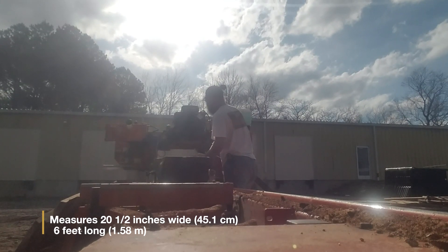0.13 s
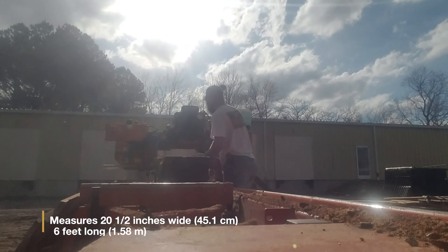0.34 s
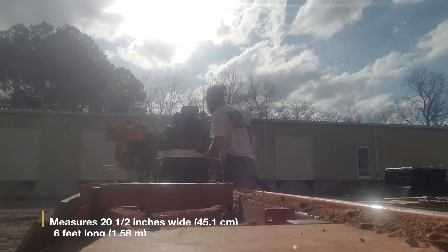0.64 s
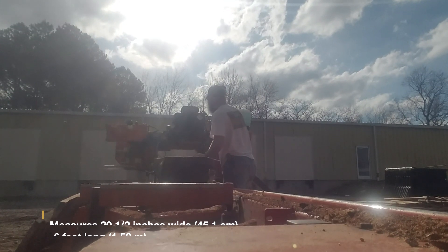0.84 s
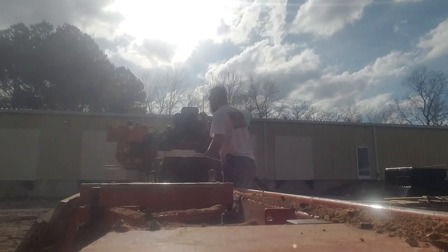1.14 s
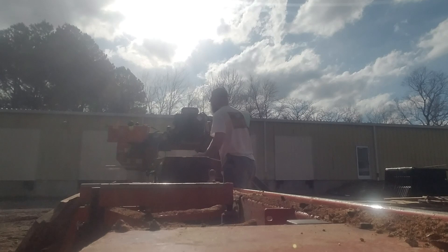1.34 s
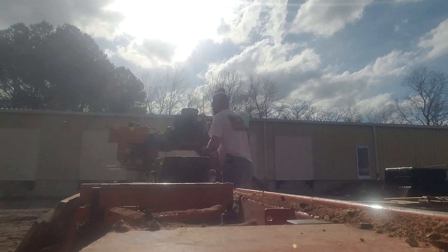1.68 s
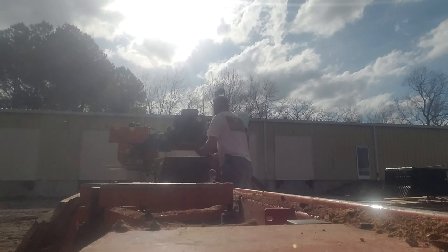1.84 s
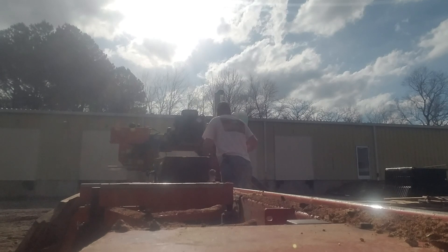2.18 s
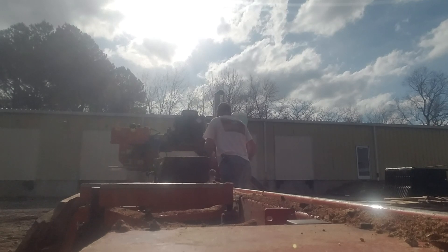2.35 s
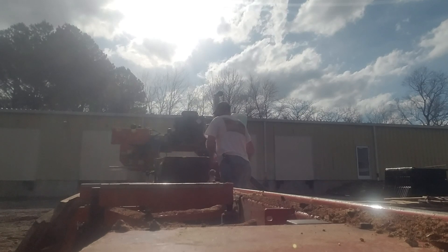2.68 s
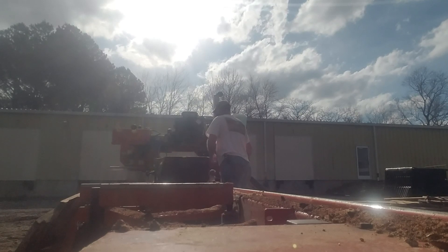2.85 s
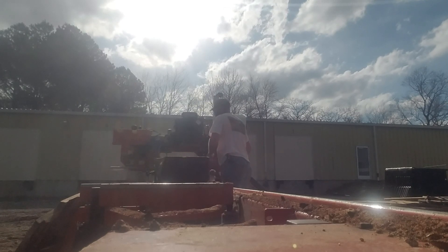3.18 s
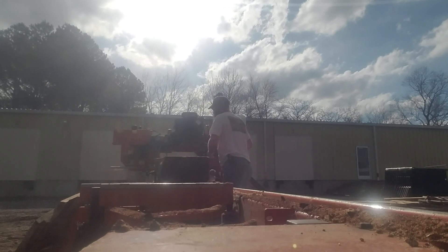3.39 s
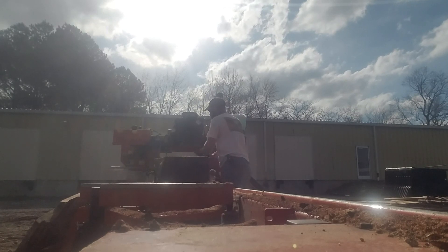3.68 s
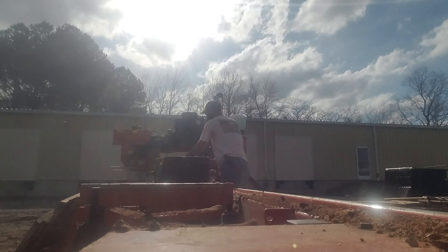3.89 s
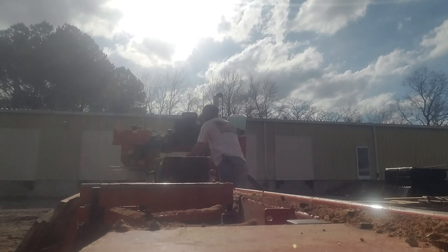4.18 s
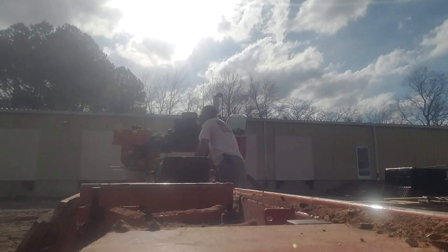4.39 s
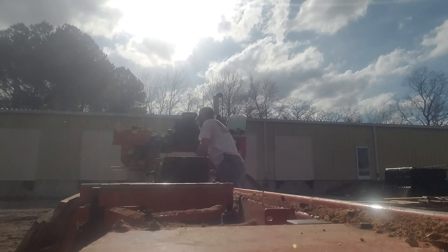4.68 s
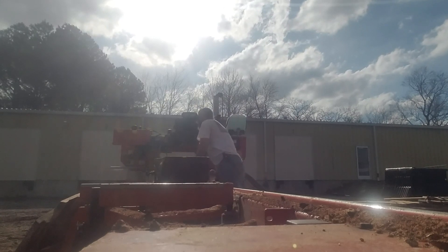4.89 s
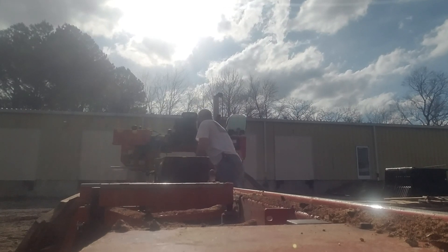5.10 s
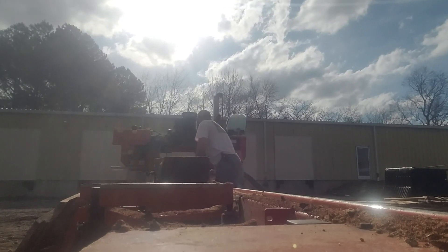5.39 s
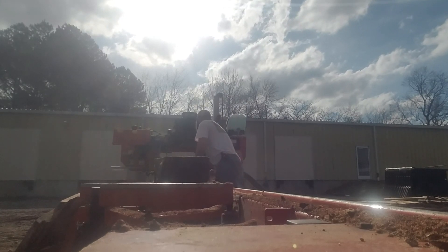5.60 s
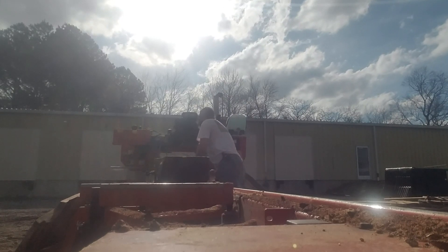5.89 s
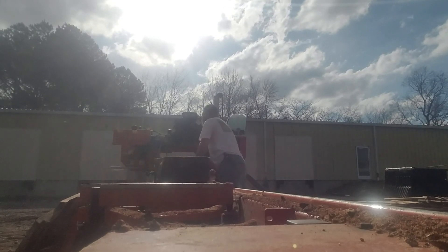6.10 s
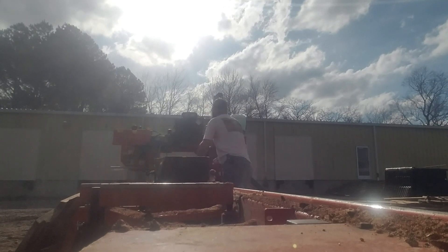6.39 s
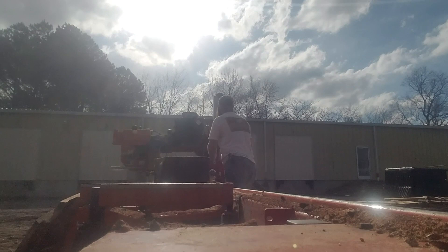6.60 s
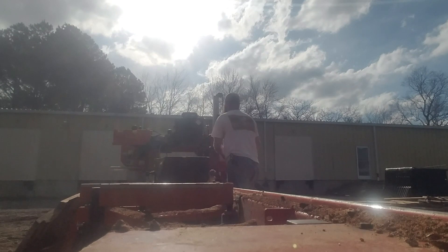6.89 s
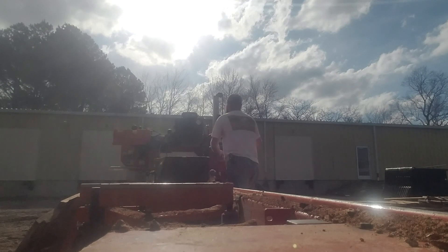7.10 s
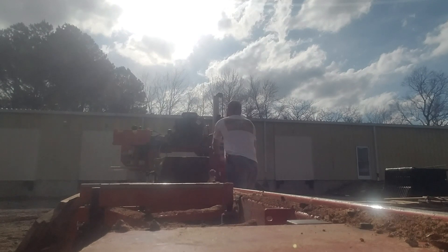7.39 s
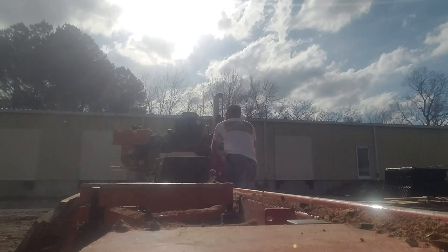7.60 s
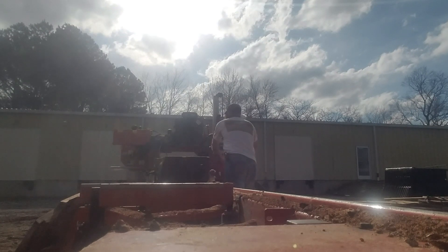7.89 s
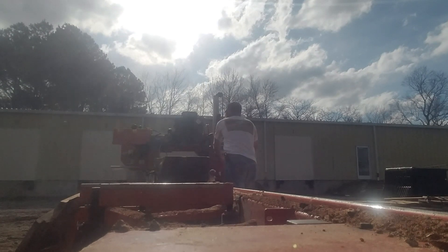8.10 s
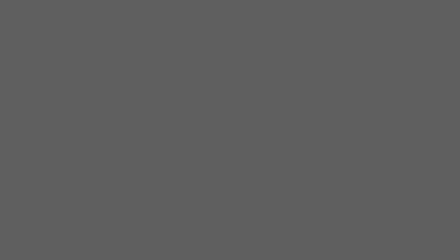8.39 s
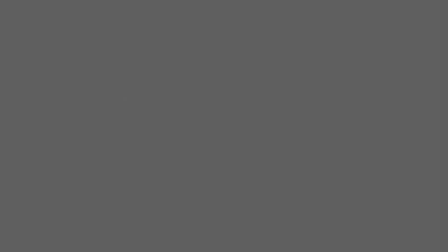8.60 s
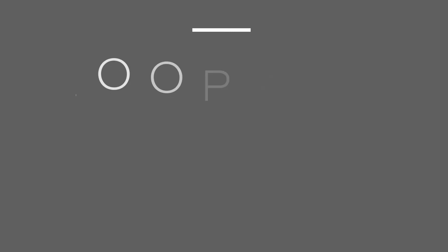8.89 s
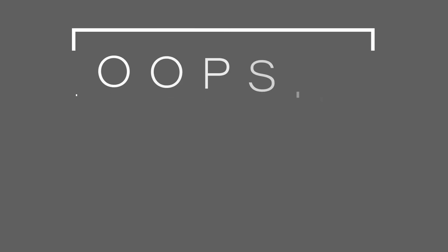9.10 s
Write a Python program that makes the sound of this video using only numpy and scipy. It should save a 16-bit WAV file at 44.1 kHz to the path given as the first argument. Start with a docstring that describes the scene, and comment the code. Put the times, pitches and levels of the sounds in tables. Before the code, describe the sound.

Outdoors, very close to a portable sawmill, a small petrol engine sags under load with deep rumble. The frame groans twice within the first second, then the engine surges and the blade sizzles brighter. It eases to a rough steady drone with wavering belt hum, faint squeaks and soft wind thumps. Around eight seconds everything cuts instantly to silence.

```python
"""Portable band sawmill

A small petrol engine outdoors bogs down under load, the log groans twice under the stalling blade, then the
engine surges and the governor hunts back to speed. Tones locked to the engine cycle and filtered noise make the
engine; filtered noise and ringing resonances make the running blade, with a belt hum, squeaks and puffs of
wind. Two close microphone ports pick it up. The sound stops dead near the end and silence follows."""
import sys
import numpy as np
from scipy import signal
from scipy.fft import rfft, irfft, next_fast_len
from scipy.io import wavfile

SR = 44100
rng = np.random.default_rng(int(sys.argv[2]) if len(sys.argv) > 2 else 0)


def transcribe(u):
    """Save the signal u as a 16-bit wav file named by the first command-line argument.

    u: samples, shape (n,) or (channels, n), limited to [-1, 1]; the rate is SR.
    q: integer samples, one column per channel.
    """
    v = np.clip(np.atleast_2d(u).T, -1, 1)
    q = np.round(v * 32767).astype(np.int16)
    wavfile.write(sys.argv[1], SR, q)


N = 407921
TIME_S = np.arange(N) / SR
# FFT length and its frequencies; the tiny offset keeps the logarithm finite at zero
SIZE = next_fast_len(N)
HZ = np.arange(SIZE // 2 + 1) * SR / SIZE + 1e-3


def from_db(db):
    """Turn decibels into a gain."""
    return np.exp(np.log(10) / 20 * np.asarray(db))


def rms_one(x):
    """Scale to an rms (average strength) of 1."""
    return x / np.sqrt(np.mean(x ** 2) + 1e-20)


def in_time(rows):
    """Draw straight lines between the rows of a time table: one curve per column."""
    s, *columns = np.transpose(rows)
    return [np.interp(TIME_S, s, column) for column in columns]


def at_hz(points, column):
    """Read a frequency table at every FFT frequency, with straight lines on a log axis."""
    rows = np.array(points)
    return np.interp(np.log(HZ), np.log(rows[:, 0] + 1e-3), rows[:, column])


def drift(rate_hz):
    """Slow random wander of rms 1: smoothed noise, worked out at every 40th sample."""
    r = np.exp(-80 * np.pi * rate_hz / SR)
    noise = rng.standard_normal(N // 40 + 2002)
    slow = signal.lfilter([1], [1, -2 * r, r * r], noise)[2000:]  # skip the filter's start-up
    return np.interp(np.arange(N) / 40, np.arange(len(slow)), rms_one(slow))


def resonate(x, hz, width_hz):
    """Pass sound through one resonance, with gain 1 at its peak."""
    r = np.exp(-np.pi * width_hz / SR)
    feedback = [1, -2 * r * np.cos(2 * np.pi * hz / SR), r * r]
    return signal.lfilter([(1 - r * r) / 2, 0, (r * r - 1) / 2], feedback, x)


def noise_field(spectrum, patchy_db, count):
    """Three rows of coloured noise (direct, scattered left, scattered right) whose bands flicker; rms 1."""
    coloured = rfft(rng.standard_normal((3, SIZE))) * from_db(at_hz(spectrum, column=1))
    edges = np.geomspace(spectrum[0][0], spectrum[-1][0], count + 1)
    out, together = 0, drift(1.7)
    for low, high in zip(edges, edges[1:]):
        band = irfft(coloured * ((HZ >= low) & (HZ < high)), SIZE)[:, :N]
        flicker_db = patchy_db * (0.31 * together + drift(8.8))
        out = out + band * from_db(flicker_db)
    return rms_one(out)


# Resonances of muffler and frame: f/Hz, width/Hz, boost/dB
BODY_RESONANCES = [(80.7, 3.5, 8), (112.2, 7, 5.5), (130.4, 3.6, 10), (156.8, 9.1, 10), (391.8, 9.1, 14),
                   (442, 14, 10), (887, 30, 11.5), (1149, 23, 4.5), (1303, 50, 10)]


def body_db(hz):
    """A tone swells as the engine speed carries its pitch through a resonance of muffler and frame."""
    grid = np.arange(0, 1500, .25)
    boost_db = sum(db / (1 + (2 * (grid - top_hz) / width_hz) ** 2)
                   for top_hz, width_hz, db in BODY_RESONANCES)
    return np.interp(hz, grid, boost_db)


# Strong engine tones: multiples of the engine cycle rate
STRONG_MULTIPLES = (2, 3, 4, 5, 6, 14, 16, 32, 40, 42, 44, 48)
# One row per strong tone: rms level away from any resonance/dB (before growth and wander),
# gain when bogging/dB, gain when surging/dB
STRONG_TONE_LEVELS = [(-34, 4, -1), (-41.5, 4, 0), (-39, 11.5, 13.5), (-34, 5, 3), (-40.5, 10, -2.5),
                      (-45, 7, 3.2), (-42, 3, 3.5), (-45.5, -1, 1.5), (-37, -6.5, 0), (-40.5, -1, -1.8),
                      (-36.5, -1, -1.5), (-46.5, -9, -2.5)]
# Faint upper engine tones: multiple of the cycle rate, rms level before wander/dB
FAINT_TONES = [(7, -46), (8, -45), (9, -42), (10, -41), (11, -44), (13, -46), (17, -41), (18, -44),
               (20, -41), (22, -44), (28, -41), (29, -43), (30, -42), (33, -44), (34, -42), (38, -43),
               (39, -41), (45, -44), (46, -44)]
# Strong tones from this multiple up grow slowly as the cut goes on
WHINE_FROM_MULTIPLE, WHINE_DB_PER_S = 32, 0.535


def exhaust(angle, per_s, bogging, surge):
    """Sines on multiples of the engine cycle; strong ones follow effort and resonances, faint ones wander."""
    growth_db = WHINE_DB_PER_S * TIME_S
    tones = []
    for k, (db, bog_db, surge_db) in zip(STRONG_MULTIPLES, STRONG_TONE_LEVELS):
        effort_db = bog_db * bogging + surge_db * surge
        whine_db = growth_db * (k >= WHINE_FROM_MULTIPLE)
        tones.append((k, db + effort_db + body_db(k * per_s) + whine_db + 0.95 * drift(2.7)))
    for k, db in FAINT_TONES:
        tones.append((k, db + 2.2 * drift(2.5)))
    starts = rng.uniform(0, 2 * np.pi, len(tones))
    mix = sum(from_db(db) * np.sin(k * angle + start) for (k, db), start in zip(tones, starts))
    return np.sqrt(2) * mix  # a sine's peak is root two times its rms


# Colour of the engine roar: f/Hz, relative level per Hz/dB
ROAR_COLOUR = [(300, -25.5), (370, -7), (470, -0.5), (560, -3), (680, -8.5), (880, -4.5), (1010, -5.5),
               (1150, -1.5), (1260, -6.5), (1420, -11), (1850, -12.5), (2220, -14), (2700, -24),
               (3300, -51)]


def engine_roar(angle, roar_db):
    """Broad noise on which valves and firing stamp the same uneven pattern in every engine cycle."""
    starts = rng.uniform(0, 2 * np.pi, 8)
    clatter = 1 + .045 * sum(np.cos(k * angle + start) for k, start in enumerate(starts, 1))
    return from_db(roar_db) * clatter * noise_field(ROAR_COLOUR, patchy_db=0.6, count=4)


# Colour of the low rumble: f/Hz, relative level per Hz/dB
RUMBLE_COLOUR = [(18, -26), (30, -16), (45, -11), (95, -8), (150, -2.5), (200, -9.5), (280, -9.5),
                 (350, -5.5), (420, -38)]


def engine_rumble(rumble_db):
    """Low noise under the engine tones, loudest near the start, with its own level curve."""
    return from_db(rumble_db) * noise_field(RUMBLE_COLOUR, patchy_db=0.7, count=2)


# Pitch in multiples of the engine cycle rate; peak level before resonance and wander; gain when surging
HUM_MULTIPLE, HUM_DB, HUM_SURGE_DB = 5.74, -37.5, 9.5


def drive_hum(angle, per_s, surge):
    """The belt slips a little, so its hum wavers in pitch and strength."""
    hum_db = HUM_DB + HUM_SURGE_DB * surge + body_db(HUM_MULTIPLE * per_s)
    return from_db(hum_db + 3.5 * drift(2.6)) * np.sin(HUM_MULTIPLE * angle + 0.46 * drift(5.3))


# Judders that make up the two log groans: t/s, peak level/dB, f/Hz
GROAN_JUDDERS = [(0.276, -15.5, 265), (.31, -9.5, 264), (.35, -11.5, 273), (0.65, -17.5, 247),
                 (0.685, -10.5, 268)]


def groans():
    """Short low judders of the log under the stalling blade: each tone rises softly for 9 ms, then dies away."""
    out, t = np.zeros(N), np.arange(round(.12 * SR)) / SR
    shape = t / .009 * np.exp(1 - t / .009)
    for s, db, hz in GROAN_JUDDERS:
        out[round(s * SR):][:len(t)] += from_db(db) * shape * np.sin(2 * np.pi * hz * t)
    return out


# Colour of the blade hiss: f/Hz, relative level per Hz/dB
HISS_COLOUR = [(2300, -2.5), (2650, -7), (3000, -0.5), (3300, -8), (3700, 0), (4800, 1), (5400, 0.5),
               (6000, -7), (6500, -7), (7200, -11.5), (7800, -35)]


def blade_hiss(hiss_db):
    """The running blade's hiss: noise in the middle treble, flickering gently."""
    return from_db(hiss_db) * noise_field(HISS_COLOUR, patchy_db=0.96, count=2)


# Colour of the blade sizzle: f/Hz, relative level per Hz/dB
SIZZLE_COLOUR = [(7000, -35.5), (7600, -8.5), (8100, -3.5), (9000, -7), (9600, -7.5), (11500, -7.5),
                 (13000, -0.5), (14200, -1), (14800, -5), (17000, 5)]


def blade_sizzle(sizzle_db):
    """The running blade's sizzle: noise in the high treble, flickering gently."""
    return from_db(sizzle_db) * noise_field(SIZZLE_COLOUR, patchy_db=0.9, count=2)


# Blade and guard resonances: f/Hz, width/Hz, relative level/dB, left minus right/dB
METAL_RINGS = [(4310, 90, -25, -3), (4845, 80, -24, -6), (5290, 80, -26, 0), (5780, 50, -30, -6),
               (6245, 45, -27, -8), (8210, 60, -24, -8), (8450, 60, -26, -8), (8905, 45, -26, -10),
               (9135, 60, -28, -6), (11890, 70, -26, 3), (12270, 60, -25, 0), (13040, 110, -21, 6),
               (13960, 120, -21, 5), (14230, 100, -21, 5)]
RINGS_OVER_SIZZLE_DB = 0.1  # added to every relative level


def blade_rings(sizzle_db):
    """Metal resonances kept going by the teeth: noise through narrow filters, wavering in level."""
    out, scrape = 0, rng.standard_normal(N)
    for hz, width_hz, db, pan_db in METAL_RINGS:
        tone = rms_one(resonate(resonate(scrape, hz, width_hz), hz, width_hz))
        wavering = tone * from_db(db + 3.0 * drift(5.0))
        out = out + wavering * from_db([[pan_db / 2], [-pan_db / 2]])
    return from_db(sizzle_db + RINGS_OVER_SIZZLE_DB) * out


# Blade squeaks: t/s, length/s, f/Hz, peak level/dB
BLADE_SQUEAKS = [(2.097, 0.04, 4300, -35), (2.146, 0.062, 4320, -31.5), (2.235, 0.022, 4320, -34.5),
                 (3.848, .062, 4830, -36), (3.973, .035, 5260, -42), (4.025, .028, 5280, -41)]


def squeaks():
    """Brief tones of steady pitch as the blade rubs its guide, equal at both ports."""
    out = np.zeros(N)
    for s, length_s, hz, db in BLADE_SQUEAKS:
        t = np.arange(round(length_s * SR)) / SR
        shape = np.sqrt(np.sin(np.pi * t / length_s))
        out[round(s * SR):][:len(t)] += from_db(db) * shape * np.sin(2 * np.pi * hz * t)
    return out


# Puffs of wind: t/s, length/s, rms level at the height of the puff before the left-right split/dB
WIND_PUFFS = [(3.966, 0.085, -36.5), (4.42, 0.11, -41), (5.013, .14, -34), (7.33, .16, -28.5)]


def wind():
    """Short low puffs of noise, unrelated at the two ports and stronger at the left."""
    low_band = signal.butter(2, [35, 130], "band", fs=SR, output="sos")
    air = signal.sosfilt(low_band, rng.standard_normal((2, N)))
    gusts = np.zeros(N)
    for s, length_s, db in WIND_PUFFS:
        count = round(length_s * SR)
        gusts[round(s * SR):][:count] = from_db(db) * np.hanning(count)
    return gusts * rms_one(air) * from_db([[3], [-3]])


# The two microphone ports: f/Hz, left minus right/dB, likeness (0-1)
PORT_BALANCE = [(25, 10.5, 0.6), (60.2, 7, 0.8), (110, -1, 1), (202, -.5, 0.71), (380, -2, 1),
                (700, -0.5, 0.91), (1240, 5.5, 1), (1642, -6.5, 0), (1950, -2, 0.9), (2600, -4, 0.93),
                (3343, 1, 0.4), (4700, -4.5, 0.7), (6350, 2, 0.3), (7160, 4, 0), (7650, -2, 0),
                (9200, -5.5, .62), (11300, 7.5, 0.2), (13000, 3.5, 0.5), (15600, 5.5, .1)]
# Phase between the ports: f/Hz, lead of left over right/rad
LEFT_LEAD = [(0, 0), (300, .2), (700, .35), (1200, 0), (1500, -1.4), (1750, .9), (2200, -.4), (2700, -3.1),
             (3300, -3.3), (4000, -4.8), (5170, -3.8), (9130, -3.8), (10400, -5.6), (11200, -3.2),
             (12700, -2.6), (15400, -.5)]


def ports(direct, scattered):
    """Each port hears the direct sound with its own level and phase, mixed with its own scattered sound."""
    side = np.array([[.5], [-.5]])
    alike = np.clip(at_hz(PORT_BALANCE, column=2), 0, 1)
    lead_rad = np.interp(HZ, *np.transpose(LEFT_LEAD))
    turned = rfft(direct, SIZE) * np.exp(1j * side * lead_rad)
    mix = np.sqrt(alike) * turned + np.sqrt(1 - alike) * rfft(scattered, SIZE)
    return irfft(mix * from_db(side * at_hz(PORT_BALANCE, column=1)), SIZE)[:, :N]


# Engine speed: t/s, engine cycles per second/Hz
ENGINE_SPEED = [(0.0, 26.8), (0.35, 26.52), (0.55, 26.14), (0.68, 25.7), (0.76, 27.3), (0.96, 28.7),
                (1.08, 28.92), (1.5, 28.03), (2.1, 27.06), (2.4, 26.7), (2.75, 26.56), (3.3, 26.94),
                (4.1, 27.62), (4.75, 28.04), (5.1, 27.91), (5.45, 27.68), (6.3, 27.45), (7.3, 27.45),
                (7.85, 27.32), (8.05, 27.1), (8.33, 26.5)]
# The engine bogs down, surges as the throttle opens, then eases; the rumble has its own column:
# t/s, bogging (0-1), surge (0-1), rumble level/dB
ENGINE_EFFORT = [(0, 1, 0, -21), (.66, 0.7, 0.1, -22), (.8, 0, .99, -21), (1.1, 0.1, 1, -26),
                 (1.5, 0.04, 0.97, -29.5), (1.85, 0, 0.14, -28.5), (7.9, 0.06, 0, -28.5),
                 (8.33, .4, 0.1, -26)]
# Noise levels: t/s, engine roar level before clatter/dB, blade hiss level/dB, blade sizzle level/dB
NOISE_LEVELS = [(0, -21, -30.5, -31), (.7, -20, -29.5, -31), (1.02, -20, -28.5, -24.5),
                (2.0, -20.5, -31.5, -26.5), (2.9, -22, -32.5, -28), (4.0, -22, -32, -28.5),
                (4.5, -21, -33, -30), (6.0, -21.5, -33.5, -30), (6.8, -21, -31.5, -27),
                (7.5, -20.5, -31, -26), (8.33, -21, -31.5, -27)]


def scene():
    """Engine, drive, log, blade and wind as heard at the two ports."""
    per_s, = in_time(ENGINE_SPEED)
    bogging, surge, rumble_db = in_time(ENGINE_EFFORT)
    roar_db, hiss_db, sizzle_db = in_time(NOISE_LEVELS)
    angle = 2 * np.pi * np.cumsum(per_s) / SR  # position in the engine cycle
    tones = exhaust(angle, per_s, bogging, surge) + drive_hum(angle, per_s, surge) + groans()
    field = engine_roar(angle, roar_db) + engine_rumble(rumble_db)
    field += blade_hiss(hiss_db) + blade_sizzle(sizzle_db)
    machine = ports(field[0] + tones, field[1:])
    return machine + blade_rings(sizzle_db) + squeaks() + wind()


STOP_S, CUTOFF_HZ = 8.338, 15720


def record(dry):
    """Peaks are rounded, the sound fades to nothing in 13 ms at the stop, and the top is cut."""
    running = np.clip((STOP_S - TIME_S) / 0.013, 0, 1)
    top_cut = signal.ellip(14, .3, 80, CUTOFF_HZ, fs=SR, output="sos")
    return signal.sosfilt(top_cut, np.tanh(dry) * running)


dry = scene()
out = record(dry)
transcribe(out)
```